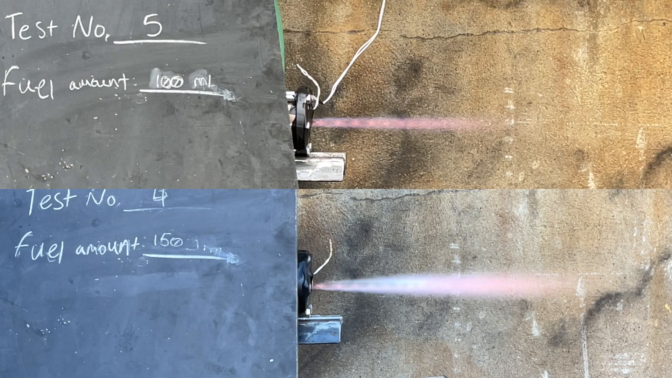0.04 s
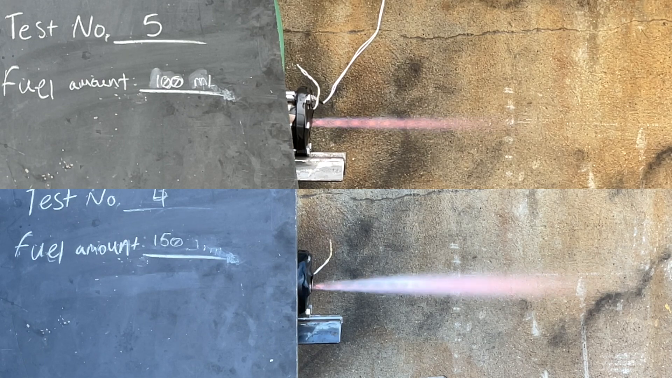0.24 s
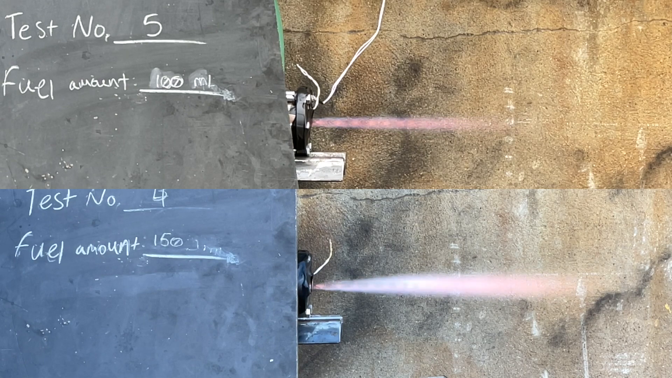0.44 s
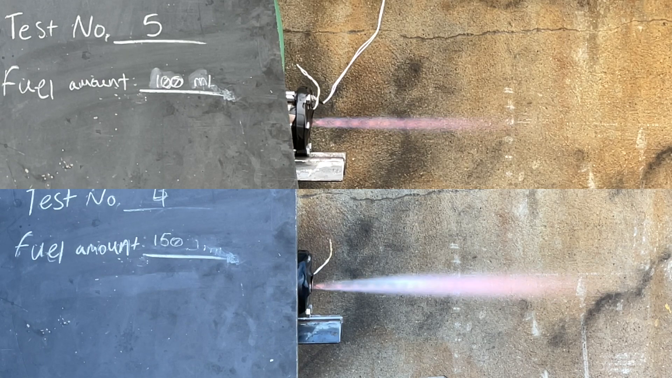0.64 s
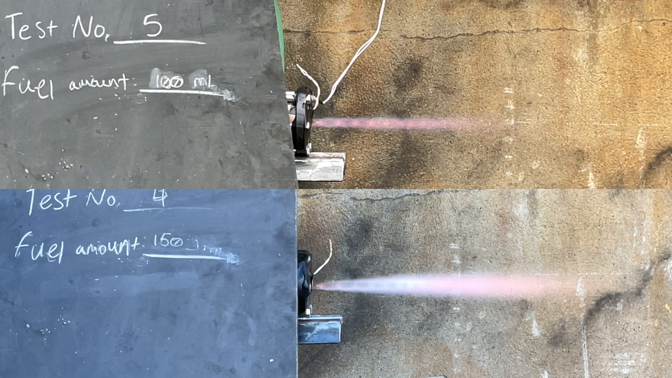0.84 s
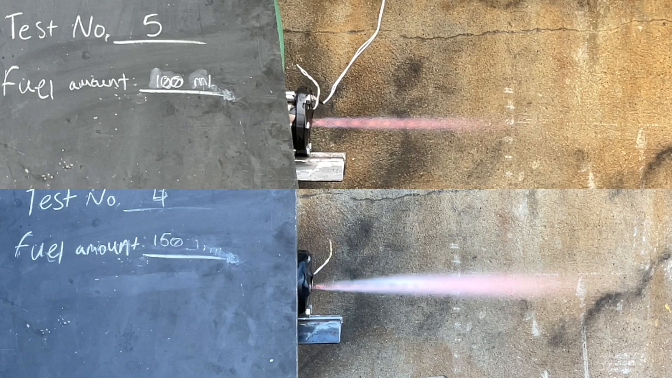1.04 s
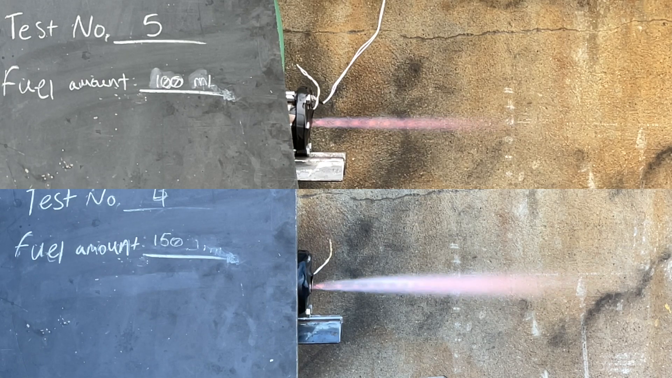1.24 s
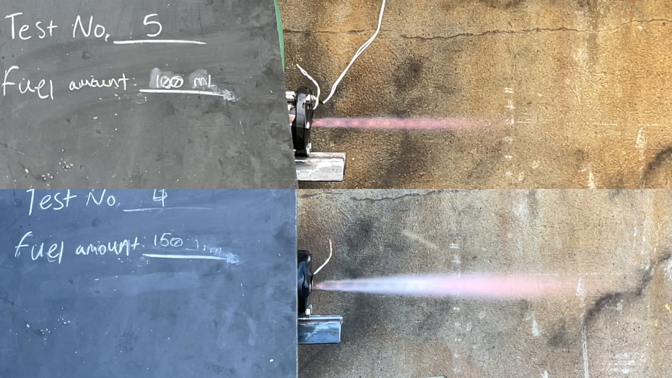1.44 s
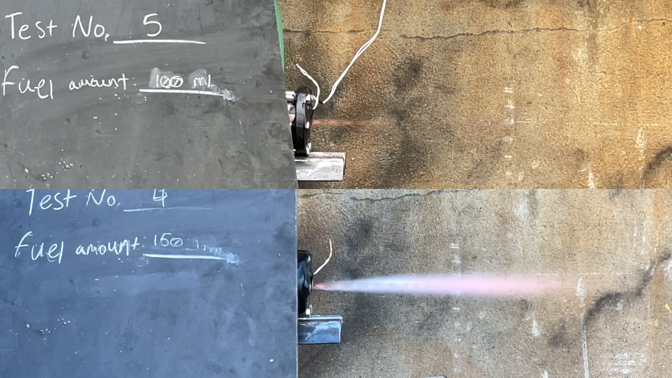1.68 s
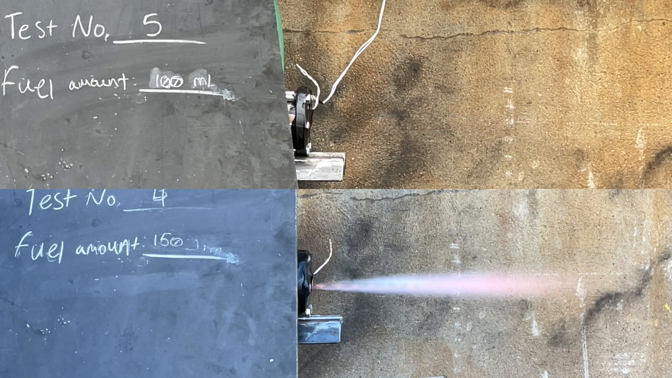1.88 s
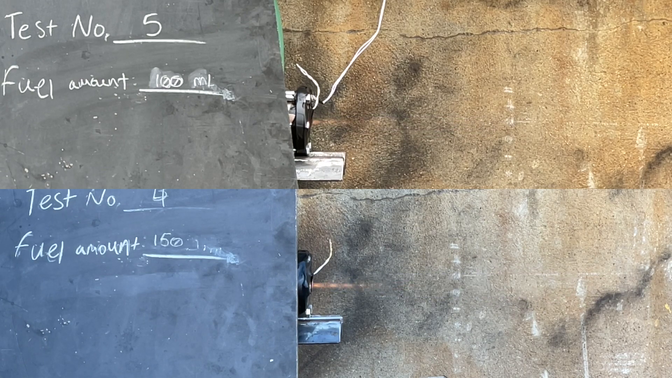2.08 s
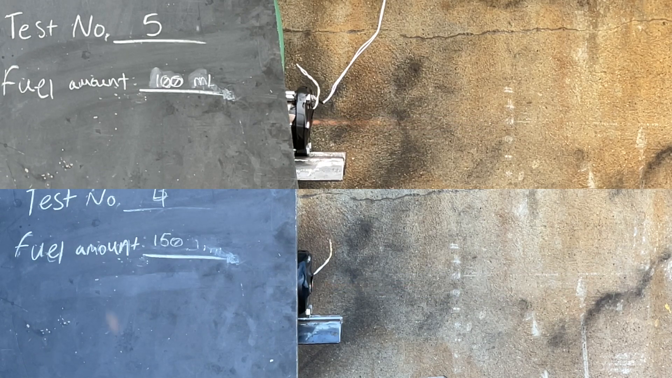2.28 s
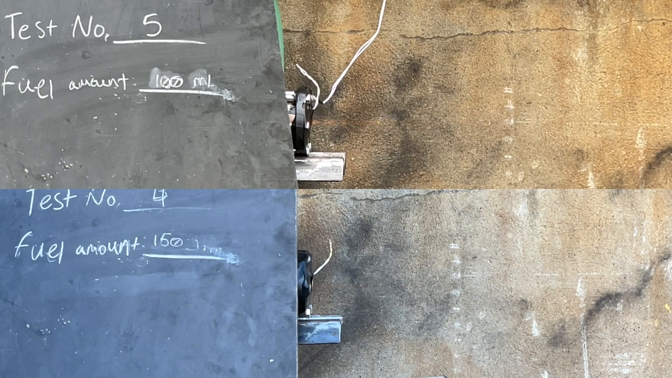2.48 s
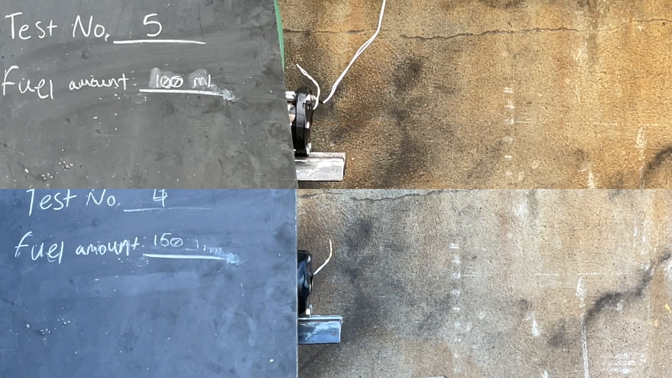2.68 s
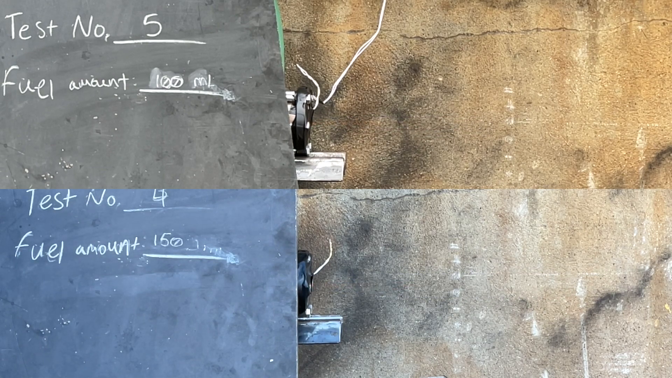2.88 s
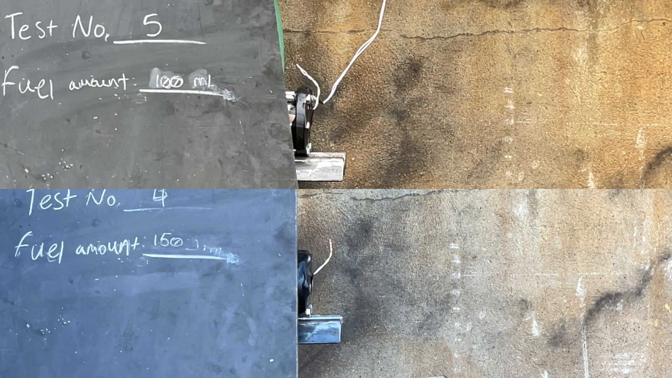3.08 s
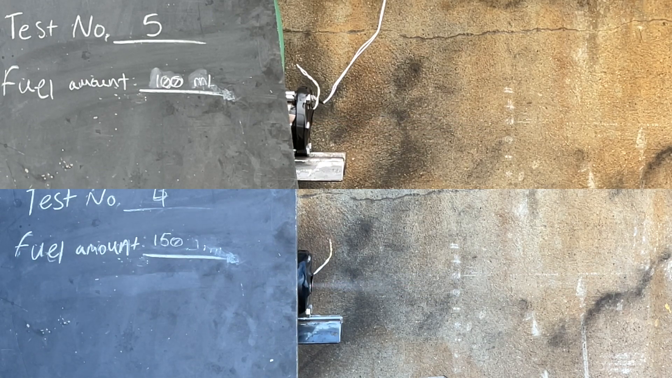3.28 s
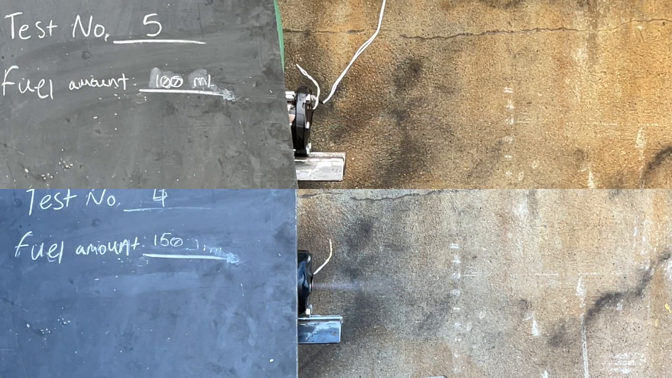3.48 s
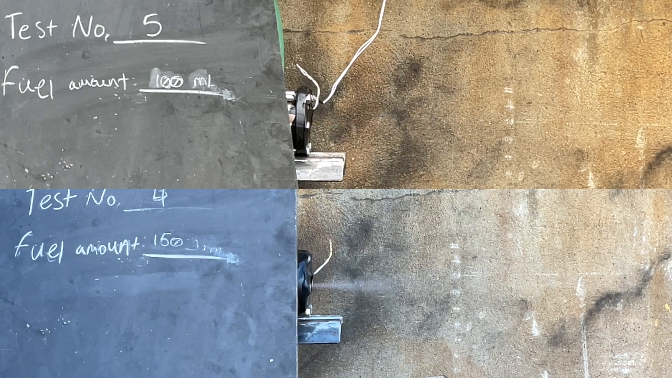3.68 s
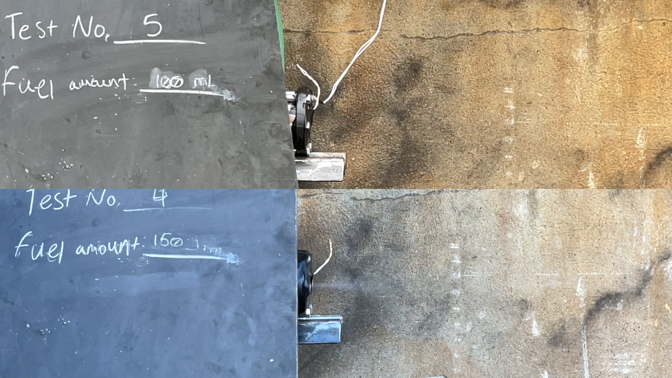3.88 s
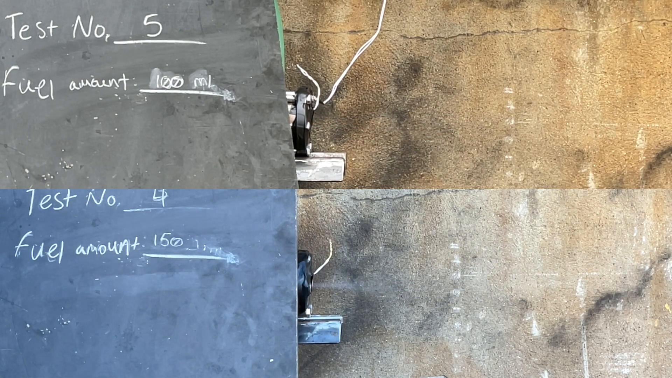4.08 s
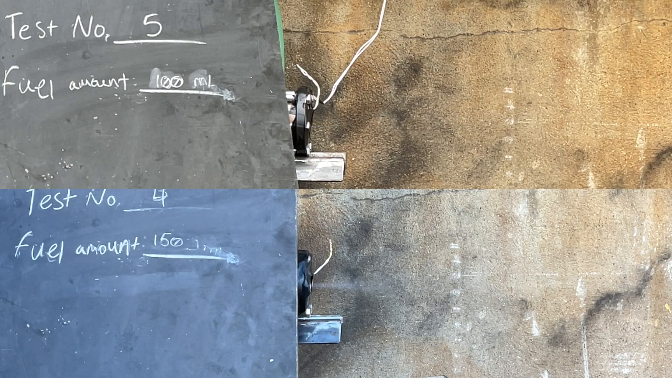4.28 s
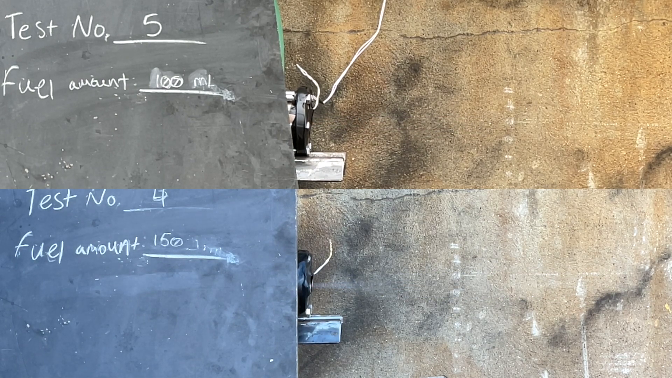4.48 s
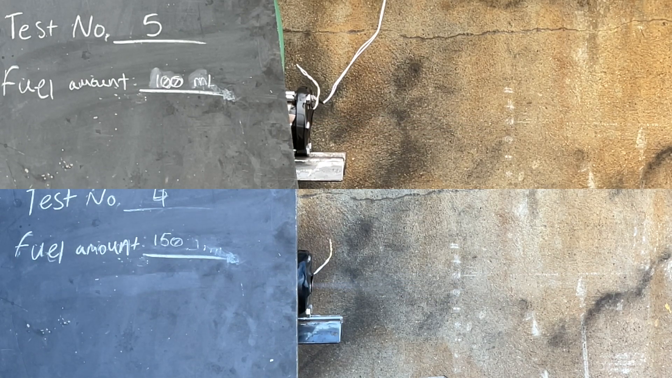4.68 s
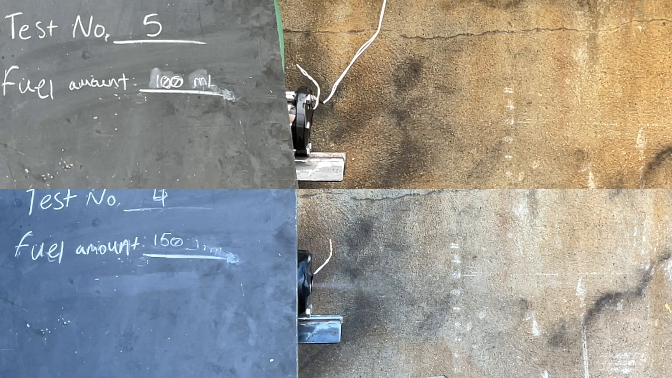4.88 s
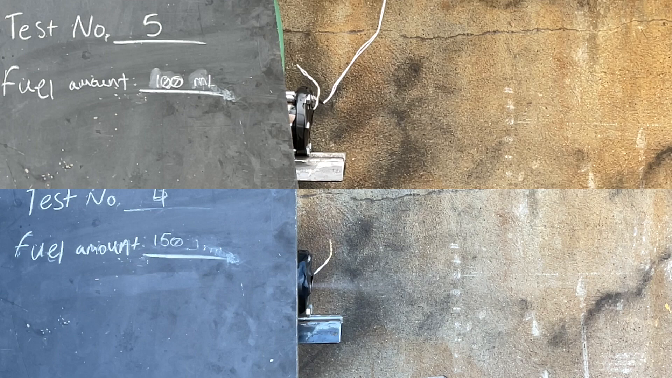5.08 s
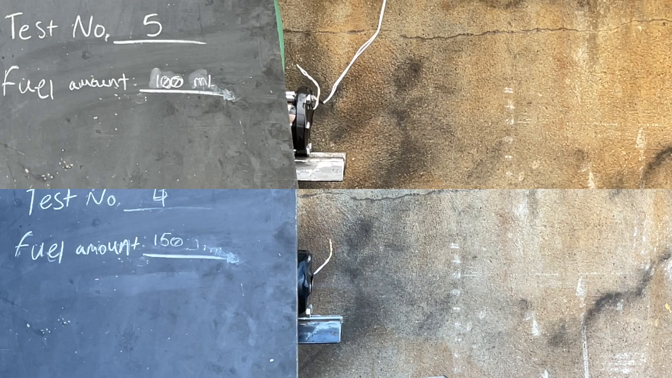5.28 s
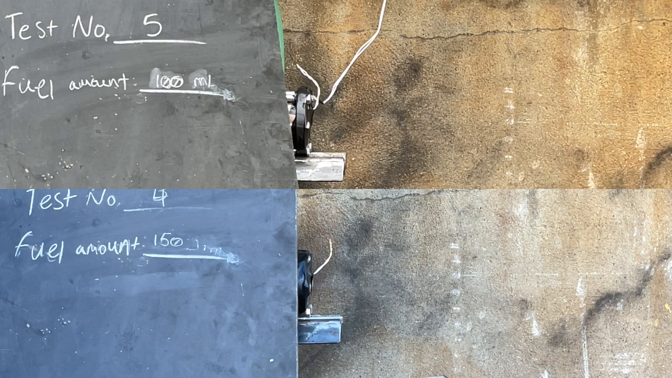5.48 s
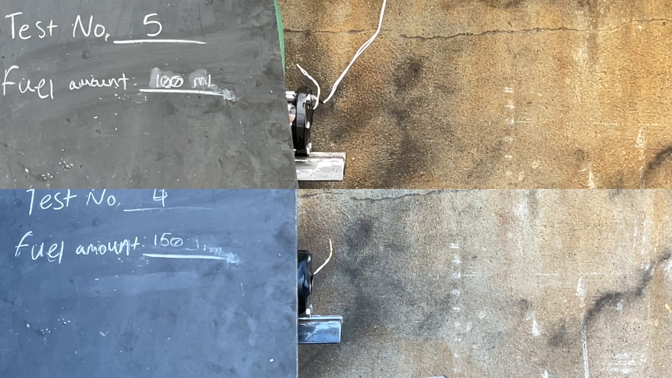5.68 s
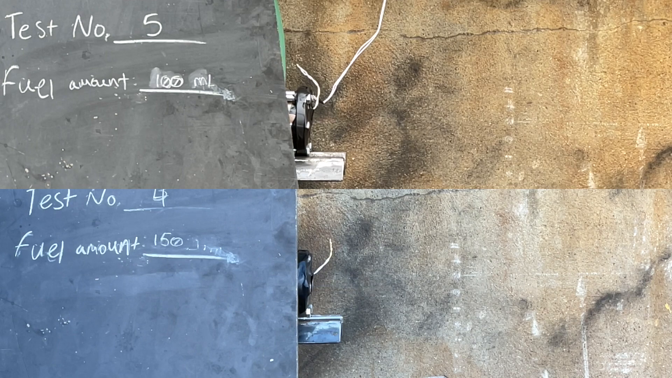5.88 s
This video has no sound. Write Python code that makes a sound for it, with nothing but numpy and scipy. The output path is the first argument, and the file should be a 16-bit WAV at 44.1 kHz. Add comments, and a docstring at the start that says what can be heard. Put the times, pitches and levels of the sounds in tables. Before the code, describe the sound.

A small rocket engine is already burning on a test stand, with a steady rushing roar, a strong hiss and a faint whistle. The flame falters, catches again briefly, gives a few low puffs and goes out. Gas keeps hissing from the nozzle in uneven surges. The microphone is very close, beside a wall, and the sound is squashed and distorted.

```python
"""Small rocket engine on a test stand

The engine burns beside a wall, so close to a phone that both its microphones overload. Fine eddies
at the nozzle hiss and ring the stand; large ones roar, and the chamber adds a faint whistle.
The flame falters, catches again, puffs and goes out. Gas keeps rushing out in uneven surges."""
import sys
import numpy as np
from scipy import signal
from scipy.fft import rfft, irfft
from scipy.io import wavfile
from scipy.ndimage import uniform_filter1d

SR = 44100
rng = np.random.default_rng(int(sys.argv[2]) if len(sys.argv) > 2 else 0)


def dump_mix(stems):
    """Bounce the given channels to the path in sys.argv[1] as a 16-bit WAV at rate SR."""
    frames = np.atleast_2d(stems).T  # one column per channel
    limited = np.clip(frames, -1, 1)  # hard clip at full scale
    pcm = np.round(limited * 32767).astype(np.int16)
    wavfile.write(sys.argv[1], SR, pcm)


N = 261954


def undb(db):
    """Decibels to gain."""
    return 10 ** (np.asarray(db) / 20)


def unit(x):
    """Scale to rms 1."""
    return x / np.std(x)


def bins():
    """Frequencies in Hz of the spectrum of a whole signal."""
    return np.maximum(np.arange(N // 2 + 1) * SR / N, 1)


def colour(points):
    """Gain at each frequency from (Hz, dB) points."""
    hz, db = np.transpose(points)
    return undb(np.interp(np.log(bins()), np.log(hz), db))


def resonance(hz, width_hz):
    """Response of one resonance, gain 1 at its centre."""
    f = bins()
    return 1 / (1 + 1j * (f ** 2 - hz ** 2) / (f * width_hz))


def noise(response):
    """Random pressure with the given frequency response."""
    return irfft(rfft(rng.standard_normal(N)) * response, N)


def drift(rate_hz):
    """Slow random wandering with spread 1."""
    return unit(noise(1 / (1 + (bins() / rate_hz) ** 2)))


def plume(response, side_points, rough_wall_hz, wall_delay_s=.00435):
    """A wide turbulent plume reaches the two microphones directly and off the nearby wall."""
    # the rough wall mirrors the lows and scatters the treble
    echo = np.exp(-2j * np.pi * bins() * wall_delay_s) / (1 + (bins() / rough_wall_hz) ** 4)
    mid = noise(response * (1 + 0.1 * echo))
    # the echo comes from the other side, so it is inverted in the microphones' difference
    side = noise(response * colour(side_points) * (1 - 0.41 * echo))
    return unit(np.array([mid + side, mid - side]))


# Short paths off the board and the stand. Each row: delay in seconds, gain.
NEAR_REFLECTIONS = [(.00185, .1), (.00236, -0.077), (.0032, .06), (.0047, 0.061)]

def reflect(sound, wander_s=.00004):
    """Surfaces near the microphones ripple the spectrum; moving hot air shifts each path a little."""
    t = np.arange(N) / SR
    out = sound.copy()
    for delay, gain in NEAR_REFLECTIONS:
        emitted = t - delay - wander_s * drift(rate_hz=.4)
        out += gain * np.array([np.interp(emitted, t, channel) for channel in sound])
    return out


# Surges of gas. Each row: start in seconds, jet level before overload in dB, hold in seconds,
# depth of the choke just before it in dB (negative for a swell).
GAS_SURGES = [(0, -26, 1.56, 2), (1.881, -26, 0.57, 3), (2.97, -28.5, 0.04, -2), (3.407, -30.5, .03, 2),
              (3.596, -29, 0.044, 0.5), (4.083, -28, 0.15, -2.5), (4.63, -28, .08, -1),
              (4.896, -30, 0.041, 1.5), (5.22, -31, .04, 1.5), (5.482, -29.5, 0.37, 0.5)]

def gas_flow(sag_db_per_s=9, choke_s=.06, open_s=.025):
    """Jet level in dB: each surge opens quickly, holds and sags, then chokes or swells into the next."""
    t = np.arange(N) / SR
    jet_db = np.zeros(N)
    for start, db, hold, choke_db in GAS_SURGES:
        choke = choke_db * np.exp(-((t - start) / choke_s) ** 2)
        surge = db - sag_db_per_s * np.maximum(t - start - hold, 0)
        jet_db = np.where(t < start, jet_db - choke, surge)
    return uniform_filter1d(jet_db, int(open_s * SR))


# The hiss from close by. Each row: frequency in Hz, relative level in dB.
HISS_SPECTRUM = [(100, -23.5), (350, -18), (700, -13.5), (1250, -7), (1600, -4.5), (2150, -5.5), (3000, -3),
                 (3800, -1.5), (5200, 0), (6200, -2), (7500, -6), (9500, -18.5), (14000, -32)]
# Its stereo width. Each row: frequency in Hz, the microphones' difference over their sum in dB.
HISS_STEREO = [(300, 0.5), (900, -5.5), (2000, -3.5), (2800, -3), (4000, -5), (5300, -8), (6500, -6),
               (7600, -15), (9500, -2.5)]
# Resonances of the stand and engine body. Each row: frequency in Hz, width in Hz, dB over the hiss.
STAND_MODES = [(282, 37, 7), (485, 100, 1), (739, 83, 5), (1102, 19, -17), (2447, 92, -8), (3760, 62, -18),
               (4250, 220, -20.5), (5270, 190, -15), (8820, 670, -8)]

def nozzle_hiss(jet_db, flutter_db=0.96):
    """Fine eddies at the nozzle hiss, flutter and ring the stand."""
    stand = 1 + sum(undb(db) * resonance(hz, width) for hz, width, db in STAND_MODES)
    hiss = plume(colour(HISS_SPECTRUM) * stand, HISS_STEREO, rough_wall_hz=3000)
    return unit(reflect(hiss)) * undb(jet_db + flutter_db * drift(rate_hz=17))


# Burns of the flame, the first already under way. Each row: start in seconds, length in seconds,
# level before overload in dB, fade afterwards in dB per second.
FLAME_BURNS = [(-0.2, 1.67, -31, 35), (1.868, 0.59, -35, 64)]

def flame_strength(catch_s=0.047):
    """Amplitude of the flame: it catches, burns steadily and fades."""
    t = np.arange(N) / SR
    flame = np.zeros(N)
    for start, length, db, fade_db_per_s in FLAME_BURNS:
        age = np.maximum(t - start, 0)
        catch = 1 - np.exp(-age / catch_s)
        burn = undb(db - fade_db_per_s * np.maximum(age - length, 0))
        flame = np.hypot(flame, catch * burn)
    return flame


# The roar from close by. Each row: frequency in Hz, relative level in dB.
ROAR_SPECTRUM = [(8, -21), (20, -2.5), (45, 1.5), (110, 1.5), (250, -3.5), (500, -3.5), (1000, -8.5),
                 (1800, -8), (3000, -21), (9000, -16.5), (14000, -39)]
# Its stereo width. Each row: frequency in Hz, the microphones' difference over their sum in dB.
ROAR_STEREO = [(80, -14), (200, -10), (380, -4), (800, -9.5), (1500, -20), (2500, -13.5), (8000, 0)]

def roar(jet_db, flame, rumble_db=-49.0, growth=3.1, flicker_db=1.35):
    """Large eddies: the flame drives them hard; cold gas weakly, but steeply more as its flow rises."""
    hot = flame * undb(flicker_db * drift(rate_hz=10.0))
    cold = undb(rumble_db + growth * (jet_db - np.median(jet_db)))
    eddies = plume(colour(ROAR_SPECTRUM), ROAR_STEREO, rough_wall_hz=900)
    return eddies * np.hypot(hot, cold)


def chamber_whistle(flame, relative_db=-15.5):
    """The burning gas excites one narrow mode of the chamber, in step with the flame."""
    mode = unit(noise(resonance(hz=1914, width_hz=32)))
    return mode * flame * undb(relative_db)


# Puffs of the faltering flame, alike at both microphones. Each row: centre in seconds, pitch in Hz,
# peak before overload in dB, half-length in seconds.
FUEL_PUFFS = [(1.865, 74.6, -35, 0.0067), (2.11, 134, -30.5, 0.011), (2.396, 33.8, -29.5, 0.042),
              (2.613, 40, -39, 0.024)]

def puffs():
    """Pockets of fuel burn at once: a low pressure swing of a few cycles at most."""
    out = np.zeros(N)
    for centre, hz, db, half_length in FUEL_PUFFS:
        t = np.arange(N) / SR - centre
        out += undb(db) * np.exp(-(t / half_length) ** 2) * np.cos(2 * np.pi * hz * t)
    return out


def scene():
    """Hiss, roar, whistle and puffs as they reach the two microphones beside the stand."""
    jet_db, flame = gas_flow(), flame_strength()
    return nozzle_hiss(jet_db) + roar(jet_db, flame) + chamber_whistle(flame) + puffs()


def record(dry, ceiling_db=-27.0, top_hz=9700):
    """This close the microphones saturate, so hiss and roar squeeze each other; then the top is cut."""
    ceiling = undb(ceiling_db)
    squashed = ceiling * np.tanh(dry / ceiling)
    lowpass = signal.firwin(1001, top_hz, window=("kaiser", 9), fs=SR)
    return signal.fftconvolve(squashed, lowpass[None], mode="same", axes=1)


dry = scene()
out = record(dry)
dump_mix(out)
```